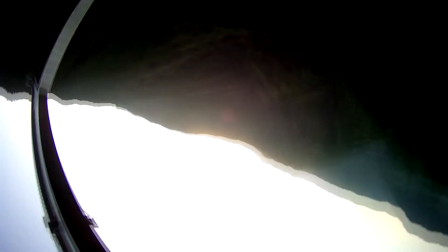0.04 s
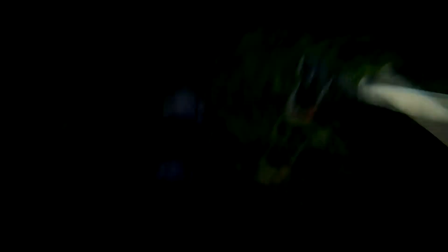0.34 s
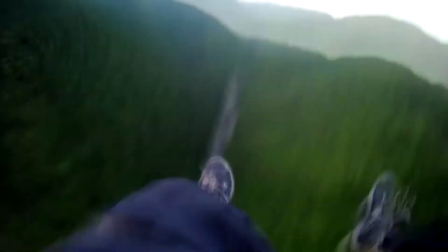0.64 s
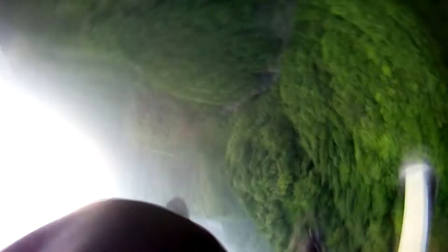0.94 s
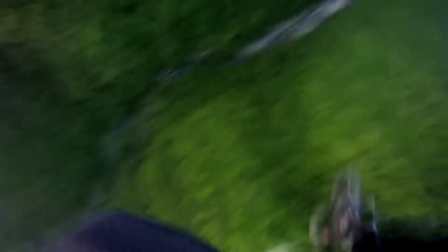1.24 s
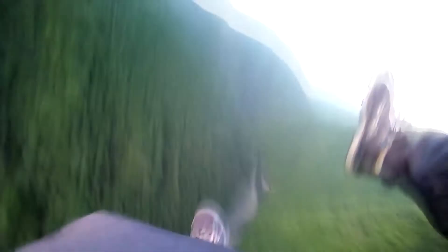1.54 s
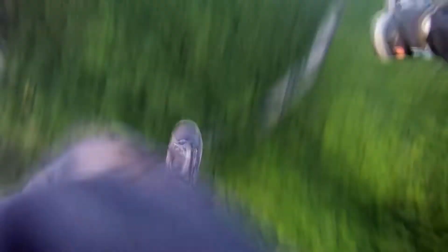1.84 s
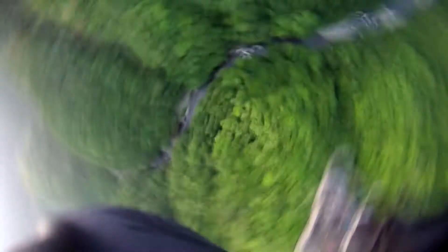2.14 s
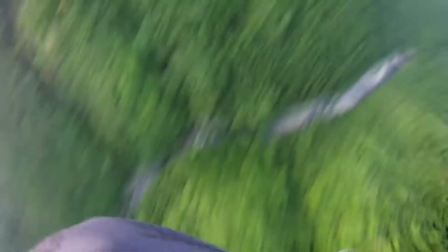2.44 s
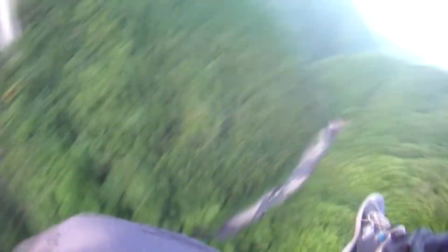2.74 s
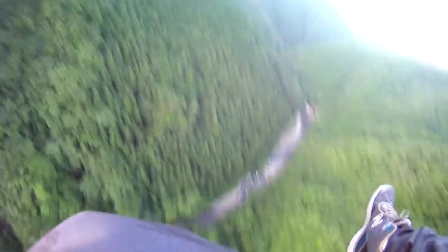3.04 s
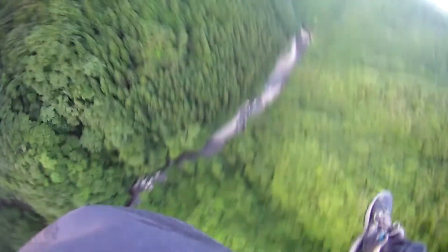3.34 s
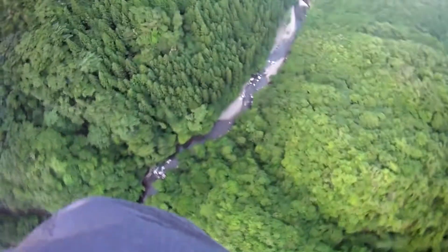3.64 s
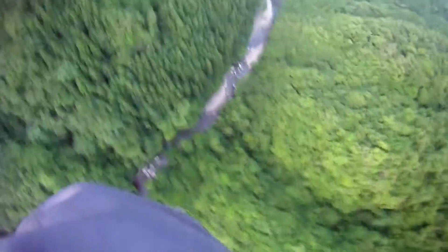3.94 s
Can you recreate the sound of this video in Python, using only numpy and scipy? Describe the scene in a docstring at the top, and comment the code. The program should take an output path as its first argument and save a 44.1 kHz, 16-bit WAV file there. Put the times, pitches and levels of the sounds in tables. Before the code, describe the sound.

Loud wind hits the microphone in two rough, fluttering bursts during a paraglider flight, each with sharp clicks of gear. Halfway through, it calms to a quiet airy rumble with soft fabric flutter.

```python
"""In the open air, on a swinging paraglider flight, wind flows round a cased camera.
A hard blast overloads the microphone, two spells of turbulence buffet it with eddies,
and harness gear snaps against the case, exciting its damped modes. Then the air calms
to a thin hiss over a low rumble and fluttering fabric, until a soft gust builds up."""
import sys
import numpy as np
from scipy import signal
from scipy.fft import rfft, irfft
from scipy.io import wavfile
from scipy.ndimage import uniform_filter1d

SR = 44100
rng = np.random.default_rng(int(sys.argv[2]) if len(sys.argv) > 2 else 0)


def unload_wav(signal):
    """Save mono or channel-first audio to the path in sys.argv[1] as 16-bit WAV at rate SR, clipped to [-1, 1]."""
    wavfile.write(
        sys.argv[1],
        SR,
        np.round(np.clip(np.atleast_2d(signal).T, -1, 1) * 32767).astype(np.int16),
    )


N = 176400
T = np.arange(N) / SR
HZ = np.fft.rfftfreq(N, 1 / SR)


def amp(db):
    """Decibels to amplitude ratio."""
    return 10 ** (np.asarray(db) / 20)


def unit(x):
    """Normalisation to rms 1."""
    return x / np.sqrt(np.mean(x ** 2) + 1e-20)


def level(points):
    """Envelope interpolated in decibels; silent outside, unless it ends near the scene's edge."""
    s, db = np.transpose(points)
    before_db = db[0] if s[0] < .1 else -200
    after_db = db[-1] if s[-1] > 3.9 else -200
    return amp(np.interp(T, s, db, left=before_db, right=after_db))


def swell(start, length, rise_s, fall_s):
    """Envelope with a linear rise, a hold and an exponential decay."""
    return np.clip((T - start) / rise_s, 0, 1) * np.exp(-np.maximum(T - start - length, 0) / fall_s)


def colour(x, spectrum):
    """Zero-phase filter with its gain interpolated over log frequency."""
    hz, db = np.transpose(spectrum)
    return irfft(rfft(x) * amp(np.interp(np.log(HZ + 1), np.log(hz + 1), db)), N)


def noise(spectrum):
    """Spectrally shaped Gaussian noise, rms 1."""
    return unit(colour(rng.standard_normal(N), spectrum))


def wobble(hz):
    """Low-pass random fluctuation, rms 1."""
    return unit(irfft(rfft(rng.standard_normal(N)) / (1 + (HZ / hz) ** 4), N))


def steady(x, size):
    """Division by the running rms evens out swells longer than size samples."""
    return x / np.sqrt(uniform_filter1d(uniform_filter1d(x ** 2, size), size) + 1e-12)


def add(mix, start, sound):
    """Superposition of a sound from a given start time."""
    part = mix[max(round(start * SR), 0):][:len(sound)]
    part += sound[:len(part)]


# noise floor spectrum: frequency_hz, gain_db
FLOOR_SPECTRUM = [(100, 4.5), (3000, 3.5), (7000, 0.5), (16000, -2)]

def noise_floor(level_db=-86):
    """Stationary, nearly white noise lies under everything."""
    return amp(level_db) * noise(FLOOR_SPECTRUM)


# fabric flutter envelope: time_s, level_db
FABRIC_LEVELS = [(0, -55.5), (2.0, -67.5), (2.45, -70.5), (2.75, -56.5), (3.0, -65.5), (3.4, -69),
                 (4.0, -66.5)]
# its spectrum: frequency_hz, gain_db
FABRIC_SPECTRUM = [(30, -5.5), (80, -1), (170, -6.5), (280, -16), (500, -30.5), (1500, -67)]

def fabric_flutter():
    """Fabric flutters in the flow: soft low noise under random amplitude modulation."""
    return level(FABRIC_LEVELS) * noise(FABRIC_SPECTRUM) * unit(amp(4.5 * wobble(hz=29)))


# clothing brushing the harness: start_s, length_s, level_db
BRUSH_STROKES = [(2.052, .022, -55.5), (2.073, .04, -67), (3.925, .08, -79)]
# friction spectrum: frequency_hz, gain_db
BRUSH_SPECTRUM = [(500, -33), (1100, -12), (1400, 1.5), (1750, -4), (2170, 10.5), (2500, -4.5),
                  (2900, -24.5), (3500, -26), (4600, -34), (7000, -42)]

def cloth_brushes():
    """Sliding friction of cloth radiates short swishes of noise."""
    return sum(amp(db) * swell(start, length, rise_s=.016, fall_s=.038) * noise(BRUSH_SPECTRUM)
               for start, length, db in BRUSH_STROKES)


# slow pressure swings: time_s, level_db
RUMBLE_LEVELS = [(0, -26.5), (.13, -26), (.3, -16.5), (.4, -30), (.62, -31), (.72, -33.5), (.85, -30.5),
                 (1.0, -43), (1.12, -38.5), (1.4, -34), (1.62, -33), (1.76, -38.5), (2.05, -39),
                 (2.2, -47.5), (2.75, -45.5), (3.1, -53), (3.5, -54), (4.0, -48)]
# their spectrum: frequency_hz, gain_db
RUMBLE_SPECTRUM = [(3, -21), (10, 7), (20, -3.5), (35, -12), (70, -17), (130, -28.5), (250, -44),
                   (500, -64.5), (1500, -100)]

def rumble():
    """Low-frequency pressure fluctuations act directly on the microphone."""
    return level(RUMBLE_LEVELS) * steady(noise(RUMBLE_SPECTRUM), size=4000)


# hiss envelope, following airspeed: time_s, level_db
HISS_LEVELS = [(0, -39), (.5, -52.5), (.72, -62.5), (.9, -59), (1.07, -57), (1.28, -61), (1.55, -61),
               (1.76, -65), (1.86, -65.5), (2.0, -70), (2.25, -67), (2.55, -72), (2.85, -72.5),
               (3.3, -73.5), (3.85, -73.5), (4.0, -68.5)]
# its spectrum: frequency_hz, gain_db
HISS_SPECTRUM = [(60, -3.5), (300, 5), (600, 0.5), (1000, -1), (1900, -1.5), (2350, 3.5), (2650, -7),
                 (3000, -14), (3500, -23), (4200, -42.5), (4900, -27), (6500, -62.5), (12000, -63.5)]

def hiss():
    """Flow noise round the case fades as the airspeed drops."""
    return level(HISS_LEVELS) * noise(HISS_SPECTRUM) * unit(amp(0.83 * wobble(hz=29.2)))


# smooth gusts: start_s, length_s, level_db, low_edge_hz, high_edge_hz
GUST_BANDS = [(.96, 0.21, -84, 4900, 4970), (1.174, 0.0073, -49.5, 202, 1020),
              (1.289, 0.037, -48, 353, 890), (1.327, 0.026, -43, 70, 720), (1.357, 0.067, -45, 600, 926),
              (1.428, 0.096, -38, 110, 430), (3.785, 0.155, -50, 54.6, 295), (3.929, .12, -46, 50, 360)]

def gust(start, length, db, low_hz, high_hz, rough_db=1.5):
    """A passing gust makes band-pass flow noise that swells, holds and decays."""
    attenuation = (1 + (low_hz / (HZ + 1)) ** 2.2) * (1 + (HZ / high_hz) ** 6)
    band = irfft(rfft(rng.standard_normal(N)) / attenuation, N) * amp(rough_db * wobble(hz=60))
    return amp(db) * swell(start, length, rise_s=.0054, fall_s=.017) * steady(band, size=2400)


# harness gear striking the case: start_s, strength_db
GEAR_IMPACTS = [(0.2945, -24), (0.3294, -14), (.4298, -22), (0.559, -24), (.5929, -40), (.6249, -29),
                (0.6564, -24.5), (0.662, -24), (0.683, -37), (0.7305, -25), (.832, -26.5), (1.4009, -30),
                (1.4255, -38), (1.5285, -48), (1.586, -36.5), (1.5995, -31), (1.69, -34), (1.829, -45.5),
                (2.833, -49.5), (3.962, -53.5)]
# modes of the case: pitch_hz, level_db, t60_s
CASE_MODES = [(1250, -6, 0.015), (1720, -2.5, 0.0088), (2218, -2, 0.014), (2420, -16, 0.013)]
# filter on ring and tick: frequency_hz, gain_db
SNAP_RESPONSE = [(200, -22), (800, -5), (1300, 3), (2300, 1.5), (2750, -16), (3500, -25), (4600, -22.5),
                 (5300, -42.5), (12000, -76)]

def gear_snaps(tick_db=-3, tick_decay_s=.001, attack_s=.0004):
    """Each impact gives a tick of noise and excites damped modes of the case."""
    snaps, t = np.zeros(N), T[:2000]
    for start, db in GEAR_IMPACTS:
        ring = sum(amp(mode_db - 60 * t / t60) * np.sin(2 * np.pi * hz * rng.uniform(.98, 1.02) * t)
                   for hz, mode_db, t60 in CASE_MODES)
        attack = 1 - np.exp(-t / attack_s)
        tick = amp(tick_db) * rng.standard_normal(len(t)) * np.exp(-t / tick_decay_s)
        add(snaps, start, amp(db) * (attack * ring / 2 + tick))
    return colour(snaps, SNAP_RESPONSE)


# two spells of turbulence, an envelope each: time_s, level_db
BUFFET_SPELLS = [
    [(0, -49), (.12, -42), (.2, -46), (.28, -29.5), (.34, -32), (.41, -32.5), (.45, -39.5), (.5, -34.5),
     (.54, -33), (.63, -41), (.675, -30.5), (.695, -32.5), (.71, -75)],
    [(1.415, -40), (1.43, -39), (1.52, -32), (1.545, -44), (1.585, -39.5), (1.61, -34.5), (1.665, -40.5),
     (1.7, -41), (1.73, -66)],
]
# spectra of the low buffet and the brighter flutter: frequency_hz, gain_db
BUFFET_SPECTRUM = [(15, 10.5), (50, -7), (110, 0), (250, -4.5), (450, -14.5), (800, -27.5), (1300, -34.5),
                   (3000, -57.5), (8000, -70.5)]
FLUTTER_SPECTRUM = [(100, -20.5), (400, -2.5), (750, 2), (1300, -6), (1900, -8.5), (2350, -8),
                    (2800, -21.5), (3500, -37), (5000, -46), (6500, -66.5), (12000, -86.5)]

def turbulence(eddy_hz=90, flutter_db=-16.5):
    """Passing eddies modulate low noise; the strongest tear into a brighter flutter."""
    eddies = 2 * np.tanh(wobble(eddy_hz) / 2)
    buffet = steady(noise(BUFFET_SPECTRUM) * amp(4.5 * eddies), size=2400)
    flutter = steady(noise(FLUTTER_SPECTRUM) * amp(8 * eddies), size=3000)
    return sum(level(spell) for spell in BUFFET_SPELLS) * (buffet + amp(flutter_db) * flutter)


# big eddies hitting the microphone: centre_s, peak_db, half_width_s
BIG_EDDIES = [(0.6603, -25.5, 0.0011), (1.9223, -20.5, .0042), (2.053, -43, 0.002)]

def eddy_thump(centre, db, half_width, rough_db=-15, rough_s=.0098):
    """A big eddy is a bipolar pulse, suction then pressure, within a short burst of noise."""
    u = (T - centre) / half_width
    pulse = u * np.exp((1 - u ** 2) / 2)
    burst = amp(rough_db) * noise(BUFFET_SPECTRUM) * np.exp(-((T - centre) / rough_s) ** 2 / 2)
    return amp(db) * (pulse + burst)


# sharp eddies hitting the microphone: start_s, strength_db, width_s
SHARP_EDDIES = [(0.3923, -24.5, 0.0015), (.401, -10, 0.0038), (0.558, -23, 0.0023), (0.599, -23.5, 0.0018),
                (0.655, -14, 0.0016), (0.6622, -18.5, 0.00087), (1.425, -20, 0.00096),
                (1.531, -19.5, 0.0023), (1.558, -20, 0.00075), (1.6, -25.5, .001), (1.609, -21, 0.002),
                (1.646, -22.5, 0.0029), (1.667, -22.5, 0.00099), (1.693, -28, .002), (1.827, -40, 0.00017)]
# filter on the knocks: frequency_hz, gain_db
KNOCK_RESPONSE = [(20, 4.5), (100, 2.5), (800, 0), (1400, -7.5), (2400, -9), (3300, -11), (6000, -42),
                  (12000, -60)]

def eddy_knocks(wake_db=-13.5, wake_decay_s=.0041):
    """A pressure transient: sudden suction springs back and leaves a short turbulent wake."""
    knocks, t = np.zeros(N), T[:3000]
    flutter = noise(FLUTTER_SPECTRUM)
    for start, db, width in SHARP_EDDIES:
        u = t / width
        pulse = 2 * u * (u - 2) * np.exp(-u)
        wake = amp(wake_db) * flutter[round(start * SR):][:len(t)] * np.exp(-t / wake_decay_s)
        add(knocks, start, amp(db) * (pulse + wake))
    return colour(knocks, KNOCK_RESPONSE)


# moments of overload: start_s, length_s, strength_db
OVERLOAD_RUNS = [(0.252, 0.0037, -34), (0.285, 0.011, -46), (0.323, 0.0065, -41.5), (.341, 0.0022, -47),
                 (0.656, 0.0043, -46.5), (1.423, 0.0012, -52.5)]
# filter on the clicks: frequency_hz, gain_db
CRACKLE_RESPONSE = [(300, -14), (900, -2), (1500, 10.5), (2300, 11.5), (3000, -1), (4500, -7.5),
                    (6000, -15), (11000, -24), (16000, -26)]

def overload_crackle(clicks_per_s=1500, jitter=.18):
    """Pressure overloading the microphone is heard as brief, nearly regular impulse trains."""
    crackle = np.zeros(N)
    for start, length, db in OVERLOAD_RUNS:
        gaps, sizes = amp(np.log(10) * rng.standard_normal((2, 40)))  # log-normal
        times = np.cumsum(gaps ** jitter) / clicks_per_s
        times -= times[0]
        inside = times < length
        clicks = np.bincount((times[inside] * SR).astype(int), sizes[inside], round(length * SR) + 1)
        add(crackle, start, amp(db) * unit(clicks))
    return 2 * colour(crackle, CRACKLE_RESPONSE)


# head-on blast envelope: time_s, level_db
BLAST_LEVELS = [(0, -41.5), (.04, -32.5), (.13, -34.5), (.158, -37.5), (.175, -57), (.25, -58), (.3, -34),
                (.335, -37), (.37, -41), (.42, -46.5), (.47, -55), (.6, -78), (.7, -81)]
# its spectrum: frequency_hz, gain_db
BLAST_SPECTRUM = [(70, -30.5), (170, -5), (300, -2.5), (560, -4), (900, -5.5), (1400, -9.5), (1900, -9),
                  (2300, -4), (2850, -11.5), (3450, -25), (4200, -27.5), (4900, -31.5), (5600, -41.5),
                  (7000, -53.5), (14000, -83.5)]

def blast(rough_db=1.3):
    """Air impinging on the case head on makes slightly ragged broadband noise."""
    return level(BLAST_LEVELS) * noise(BLAST_SPECTRUM) * unit(amp(rough_db * wobble(hz=86)))


def scene():
    """Pressures from the air and the gear superpose at one microphone."""
    air = hiss() + blast() + rumble() + turbulence() + eddy_knocks()
    air += sum(gust(*row) for row in GUST_BANDS)
    air += sum(eddy_thump(*row) for row in BIG_EDDIES)
    background = fabric_flutter() + noise_floor() + cloth_brushes()
    return (air + background + gear_snaps() + overload_crackle())[None]


def record(dry, ceiling=.23, cutoff_hz=15900):
    """Soft saturation flattens the largest slow swings; a low-pass filter limits the band."""
    slow = uniform_filter1d(uniform_filter1d(dry, size=24), size=24)
    saturated = slow / (1 + (slow / ceiling) ** 6) ** (1 / 6)
    low_pass = signal.firwin(511, cutoff_hz, window=("kaiser", 9), fs=SR)
    return signal.oaconvolve(dry - slow + saturated, low_pass[None], "same")


dry = scene()
out = record(dry)
unload_wav(out)
```